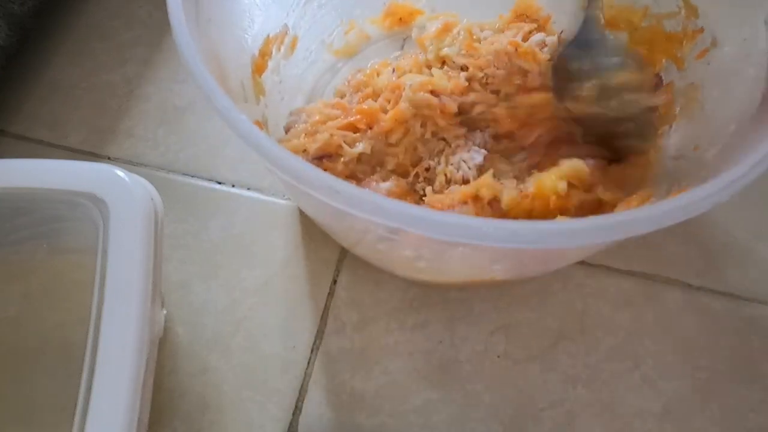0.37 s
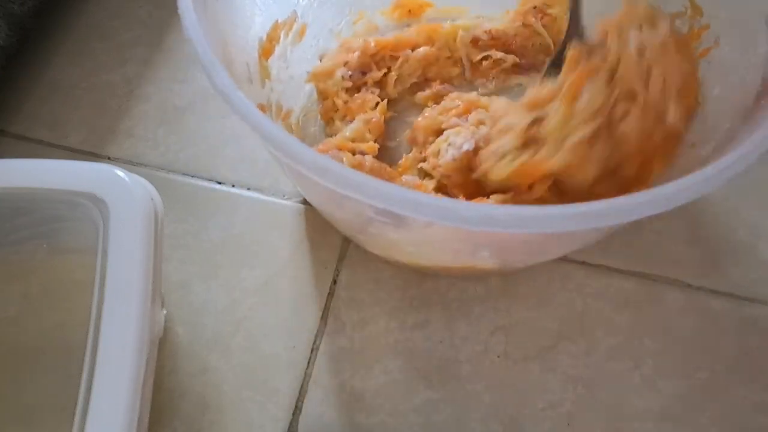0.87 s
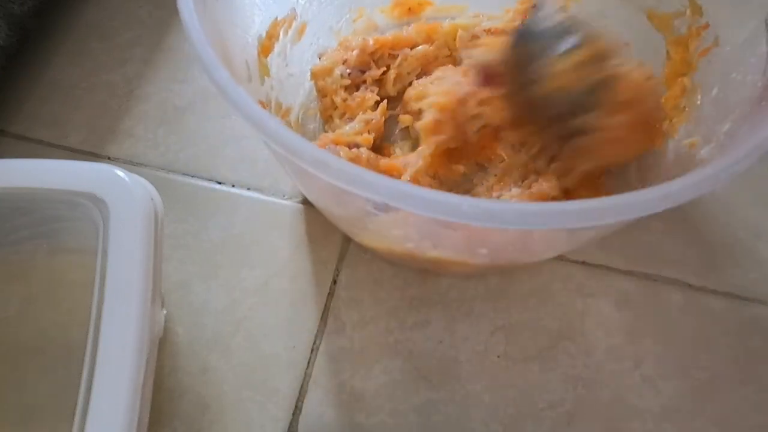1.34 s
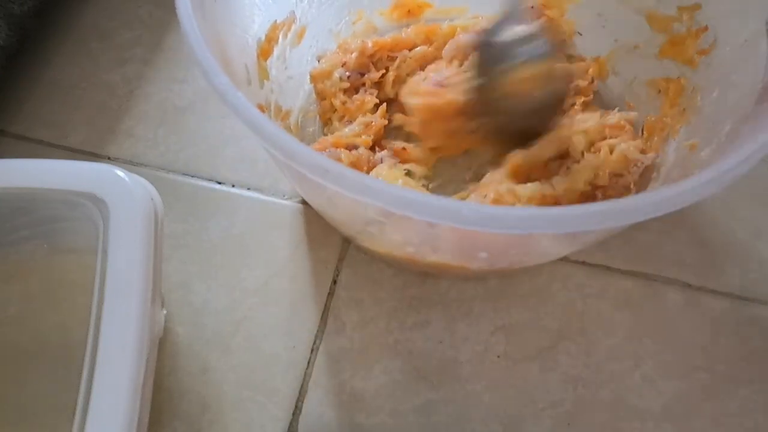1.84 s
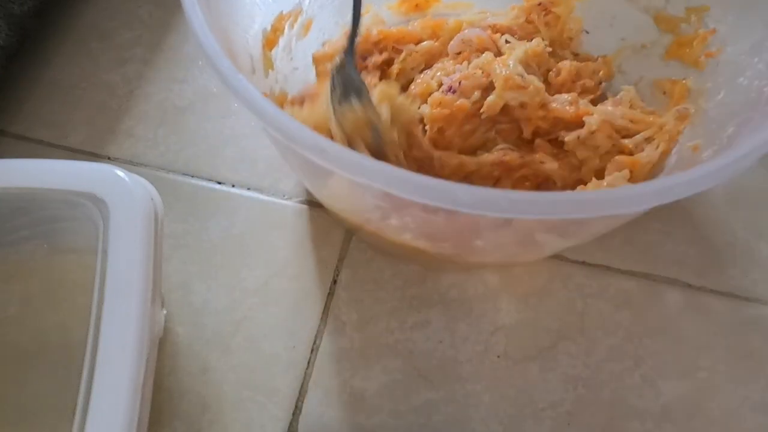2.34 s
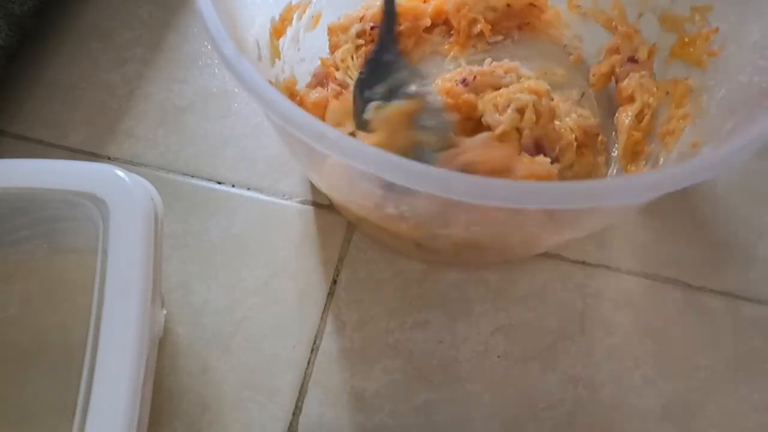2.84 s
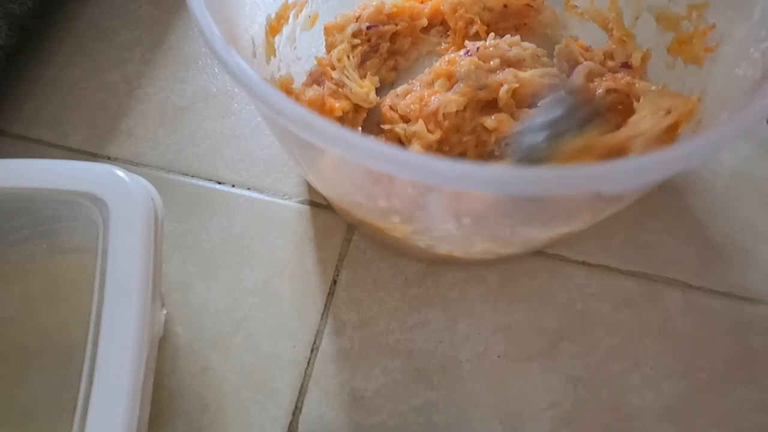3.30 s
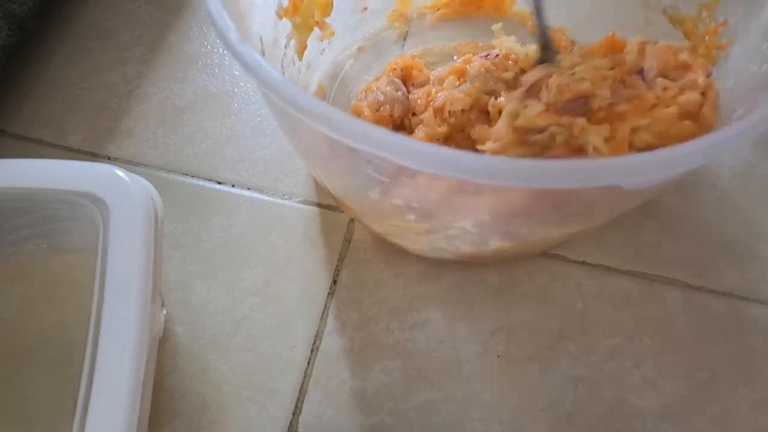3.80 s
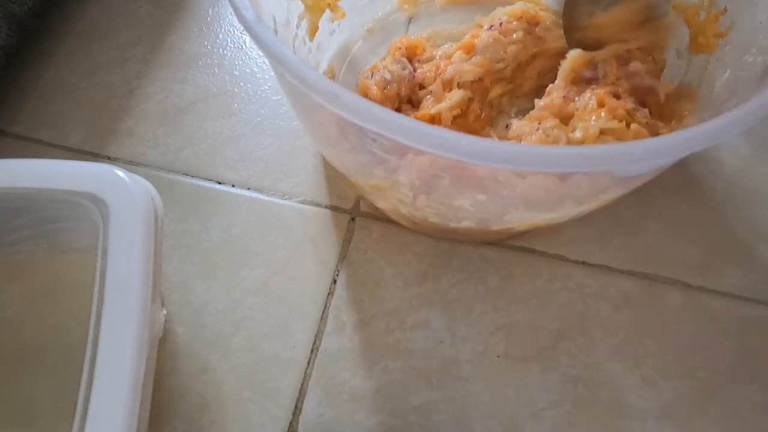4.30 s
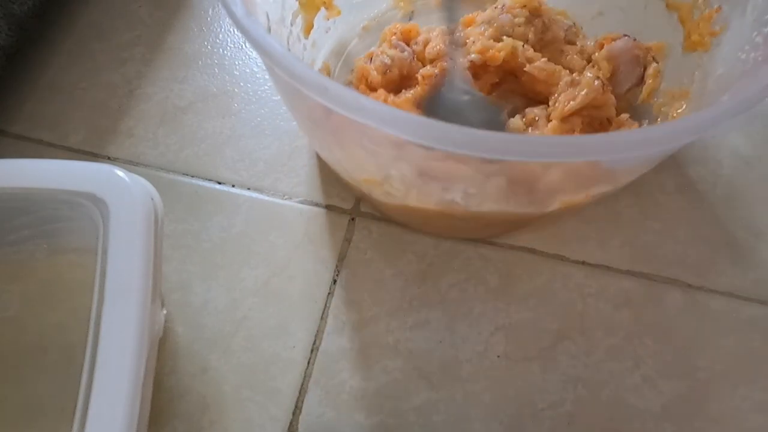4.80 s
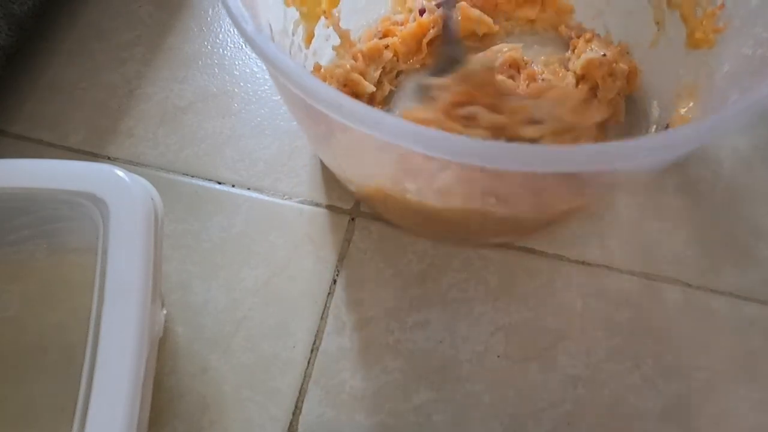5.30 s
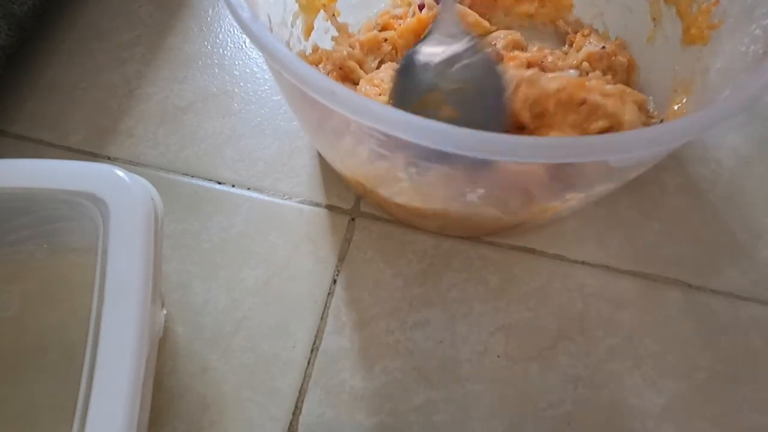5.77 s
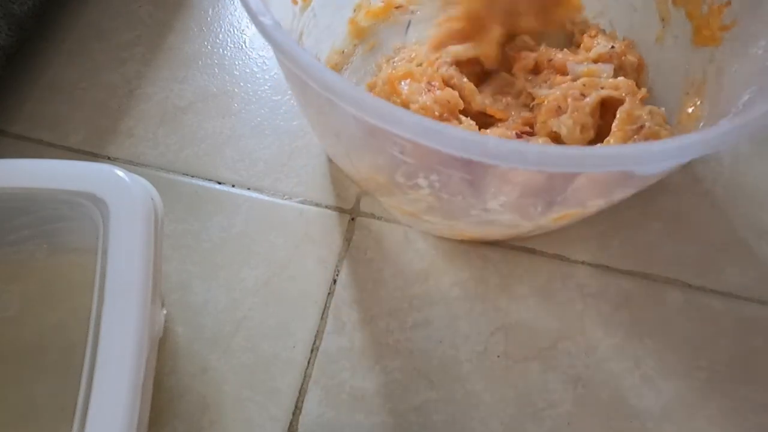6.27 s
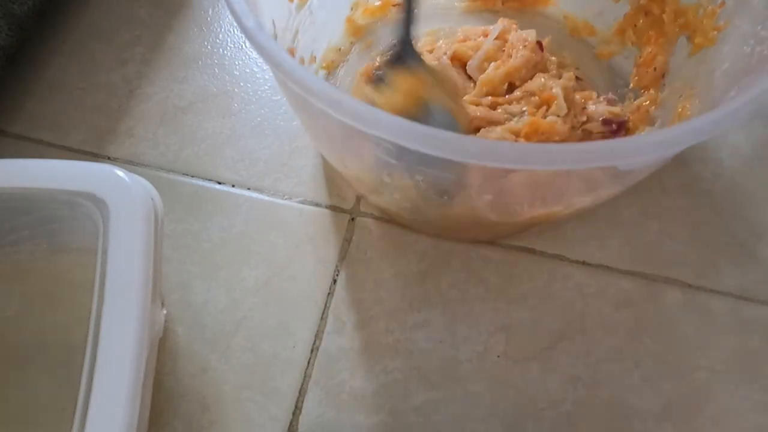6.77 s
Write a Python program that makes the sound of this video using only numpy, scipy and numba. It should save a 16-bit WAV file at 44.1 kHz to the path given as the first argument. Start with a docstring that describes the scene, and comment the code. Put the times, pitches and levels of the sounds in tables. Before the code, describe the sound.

A metal spoon briskly stirs thick, wet shredded batter in a thin plastic bowl, with sharp clicks, hollow knocks, scrapes and sticky squelches.

```python
"""A metal spoon stirs a thick, shredded batter in a thin plastic bowl on a tiled counter, close to a phone.
Its ticks are bursts of short rings; its knocks drive damped modes of the wall and the bottom.
The edge drags in stick-slip over the wall, while dense grains make wet crackle, fizz, pops and squelches.
A short echo, a low rumble with a wavering hum, faint steady tones and a hiss fill the kitchen."""
import sys
import numpy as np
from scipy import signal
from scipy.fft import rfft, irfft, next_fast_len
from scipy.io import wavfile
from scipy.ndimage import uniform_filter1d
from numba import njit

SR = 44100
rng = np.random.default_rng(int(sys.argv[2]) if len(sys.argv) > 2 else 0)


def store_wav(level_fs):
    """Save 16-bit WAV to argv[1]."""
    pcm = np.round(np.clip(np.atleast_2d(level_fs), -1, 1) * 32767)
    wavfile.write(sys.argv[1], SR, pcm.T.astype(np.int16))


def amplitude_ratio(level_db):
    """Convert a level in decibels to the matching linear amplitude (field) ratio."""
    exponent = np.asarray(level_db, float) / 20
    return 10 ** exponent


N = 303672
T = np.arange(N) / SR
SIDES = np.array([[1], [-1]])  # spreads a side signal to left and right

# ticks of the spoon's edge: (time [s], relative level [dB], pitch [Hz], chatter length [ms])
TICKS = [(0.0284, -12, 2010, 5.95), (0.1153, -21, 1980, 9.2), (0.188, -27, 4200, 3.5),
         (0.2512, -22.5, 2420, 4.9), (0.2992, -21.5, 2570, 5.1), (0.4066, -26, 3770, 4),
         (0.5189, -21.5, 5130, 3), (0.5773, -8, 1190, 2.96), (0.5773, -6.5, 2120, 2.8),
         (0.6404, -26.5, 4850, 4), (0.6792, -21, 2050, 5.9), (0.813, -19, 2140, 4.4),
         (0.835, -23.5, 4000, 5), (0.8824, -15.5, 2380, 13), (0.8818, -11.5, 1440, 9.9),
         (0.886, -13.5, 4400, 8), (0.927, -17, 5550, 6), (0.934, -14.5, 3700, 8), (0.9541, -13, 1510, 8.2),
         (1.0084, -15, 2100, 7.3), (1.052, -22, 1170, 10), (1.068, -24, 2330, 5.3), (1.261, -22, 2580, 3.8),
         (1.4463, -24, 1330, 5.3), (1.491, -21.5, 4280, 4.8), (1.5204, -26.5, 4630, 4),
         (1.691, -24.5, 4960, 8.5), (1.702, -16, 2130, 15), (1.7566, -23, 4100, 5.4),
         (1.7742, -7, 2310, 4.9), (1.8846, -21, 4000, 3.5), (1.9655, -17, 2420, 2.2),
         (2.0063, -24.5, 2760, 5.1), (2.049, -27, 4800, 3.1), (2.153, -21.5, 5440, 2.4),
         (2.212, -17, 1620, 5.1), (2.269, -27, 4930, 3.7), (2.358, -30.5, 6500, 4), (2.385, -27.5, 4670, 4),
         (2.5139, -9.5, 1850, 7), (2.5434, -19, 3700, 12), (2.581, -27, 3700, 6.3), (2.62, -17, 2200, 5.6),
         (2.655, -19, 6160, 8), (2.6607, -9.5, 6200, 20), (2.671, -17.5, 2480, 5.9), (2.704, -23, 8800, 10),
         (2.7625, -19.5, 1810, 2.3), (3.017, -8.5, 1590, 4.7), (3.0595, -17, 2500, 4.6),
         (3.104, -21.5, 3620, 5.3), (3.1724, -25, 6600, 18), (3.1974, -24.5, 6600, 3.6),
         (3.29, -24, 3640, 3.5), (3.303, -15.5, 3130, 4.3), (3.3084, -5, 1280, 2.6), (3.309, -3, 3250, 2.5),
         (3.378, -24, 2300, 4.8), (3.396, -29.5, 5500, 6.2), (3.4762, -23, 2400, 6.3),
         (3.491, -29.5, 5500, 3), (3.5324, -7.5, 1040, 5.8), (3.574, -20.5, 2220, 6.1),
         (3.6447, -14, 1490, 2.35), (3.6987, -20, 2520, 8), (3.8007, -14, 3700, 4.5),
         (3.814, -6, 4900, 6.8), (3.823, -15, 5500, 7), (3.8487, -13, 3550, 5.3), (3.936, -12, 1280, 2.83),
         (3.9901, -12, 1310, 2.4), (3.9927, -22, 3930, 3), (4.2017, -5, 2520, 2.48), (4.2018, -14, 6000, 3),
         (4.228, -26.5, 2950, 4.7), (4.274, -24, 2495, 4.1), (4.282, -22.5, 2470, 3.7),
         (4.287, -25.5, 5400, 3.7), (4.43, -18, 1380, 3.5), (4.509, -14.5, 3500, 6.9),
         (4.5153, -6, 1530, 8.7), (4.543, -26.5, 7600, 3.4), (4.64, -26.5, 6100, 4.4),
         (4.66, -24.5, 5400, 4), (4.672, -24.5, 2020, 8), (4.726, -21.5, 1510, 7.4), (4.7436, -23, 5330, 5),
         (4.781, -20.5, 5000, 6.3), (4.8178, -28, 4190, 4), (4.885, -20.5, 1910, 7.1),
         (4.9475, -20, 5940, 3.3), (5.0818, -20, 3670, 25.5), (5.0978, -15.5, 1420, 6.8),
         (5.106, -16, 1130, 8.7), (5.1245, -10, 1820, 6.1), (5.133, -8.5, 1610, 12),
         (5.171, -22.5, 5300, 5.3), (5.182, -19, 5160, 4.6), (5.206, -20, 5360, 4), (5.207, -18, 2360, 5.3),
         (5.24, -18, 5900, 6), (5.25, -4, 5030, 4.6), (5.253, -9, 1880, 6), (5.3073, -21, 2360, 4),
         (5.3256, -23, 2160, 4), (5.339, -13, 3900, 6.3), (5.4177, -25, 7100, 4), (5.441, -21, 3900, 10),
         (5.5456, -24, 935, 7.5), (5.5429, -16.5, 2500, 11.7), (5.5669, -14, 1010, 6),
         (5.771, -27.5, 1470, 5), (5.8177, -13.5, 956, 3.2), (5.918, -22.5, 4870, 3.15),
         (5.9882, -25, 2640, 6.3), (6.006, -26, 3220, 4), (6.0182, -13, 3640, 10), (6.0192, -18, 1330, 5.4),
         (6.101, -30, 2860, 3.1), (6.113, -31, 3540, 3), (6.1984, -18, 2720, 3.44),
         (6.238, -13.5, 1040, 10), (6.2658, -15.5, 1300, 9.6), (6.2901, -20.5, 2240, 4.6),
         (6.344, -13.5, 1250, 8.3), (6.385, -15, 2820, 3), (6.468, -17, 5800, 20),
         (6.474, -11.5, 7900, 13.2), (6.509, -15, 5670, 14), (6.515, -15.5, 9600, 22),
         (6.4939, -10, 2530, 5.4), (6.5834, -18.5, 1850, 5.9), (6.7379, -15.5, 2220, 10.1),
         (6.812, -9.5, 1590, 3.7), (6.812, -14, 6430, 3)]
# knocks on the bowl: (time [s], relative wall ring [dB], relative bottom thud [dB], pitch of the struck spot [Hz])
KNOCKS = [(0.0307, -23, -16, 372), (0.1177, -24.5, -23, 340), (0.5798, -13.5, -9, 340),
          (0.8861, -25, -61, 660), (0.9568, -19.5, -40, 345), (1.01, -20, -22.5, 353),
          (1.0344, -20, -54, 413), (1.262, -31.5, -20.5, 417), (1.7113, -24.5, -18, 650),
          (1.7755, -14, -22, 406), (1.9678, -15.5, -17.5, 385), (2.2132, -32, -21, 437),
          (2.5154, -29.5, -63, 423), (2.5552, -63, -26, 353), (2.7154, -18.5, -47, 710),
          (2.7765, -15, -19, 385), (3.0189, -24, -18.5, 367), (3.1243, -23, -39, 636),
          (3.3092, -11.5, -46, 1330), (3.3116, -20.5, -8, 340), (3.5342, -6.5, -53, 430),
          (3.646, -18, -36, 660), (3.868, -40, -25, 371), (3.9152, -16.5, -17, 355),
          (3.9387, -14, -46, 418), (4.2044, -22.5, -8.5, 342), (4.5178, -19.5, -10, 332),
          (4.679, -31, -24, 360), (5.089, -34, -22, 340), (5.112, -25, -37, 400), (5.128, -18, -29, 450),
          (5.1681, -21, -22.5, 430), (5.3421, -17, -30, 660), (5.5473, -26, -19.5, 338),
          (5.569, -18, -27, 660), (5.8195, -20.5, -23, 820), (6.019, -20.5, -20.5, 416),
          (6.239, -8.5, -23, 455), (6.52, -29, -23, 355), (6.5604, -27, -29, 378),
          (6.6904, -29.5, -22, 651), (1.066, -22, -34, 340), (6.8144, -22, -11.5, 346)]
# modes of the loaded bowl's wall: (frequency [Hz], relative level [dB], t60 [s])
WALL = [(340, -22.5, 0.0075), (369, -16.5, 0.18), (430, 3.5, 0.034), (517, -3, 0.02), (660, 3.5, 0.035),
        (755, -6, 0.015), (993, -0.5, 0.017), (1330, -2, 0.05), (1964, 5, 0.021)]
CRACKLE_HZ = 3314


def level(x, db):
    """Set the rms level."""
    return x * amplitude_ratio(db) / np.sqrt(np.mean(x ** 2))


def colour(x, points):
    """Filter by (frequency [Hz], level [dB]) points."""
    hz, db = np.transpose(points)
    size = next_fast_len(N)
    bins = np.arange(size // 2 + 1) * SR / size + 1
    gain = amplitude_ratio(np.interp(np.log(bins), np.log(hz), db))
    return irfft(rfft(x, size) * gain, size)[..., :N]


def ring(force, modes):
    """A force drives damped modes; a unit blow peaks near 1."""
    out = 0
    for hz, db, t60 in modes:
        pole = np.exp((2j * np.pi * hz - np.log(1000) / t60) / SR)
        out = out + amplitude_ratio(db) * signal.lfilter([1], [1, -pole], force).imag
    return out / np.sqrt(np.sum(amplitude_ratio(np.array(modes)[:, 1]) ** 2))


def clumps(hold_s):
    """Random levels that set in suddenly and sag until the next; spread near 1."""
    k = int(hold_s * SR)
    starts = np.cumsum(rng.exponential(k, 2 * N // k))
    index = np.searchsorted(starts, np.arange(N))
    sag = np.minimum((np.arange(N) - np.append(0, starts)[index]) / k, 2.5)
    steps = 0.782 * rng.standard_normal(len(starts) + 1)[index]
    return uniform_filter1d(steps - sag, size=130)


def uneven(count, spread_db):
    """Grain levels with a few loud ones among many soft."""
    return spread_db * rng.exponential(size=count)


@njit
def grains(start, hz, cycles, left, right, lag):
    """Short rings that swell for a moment and fade, each from its own direction."""
    out = np.zeros((2, N + 8192))
    for k in range(len(start)):
        fade = np.exp(-hz[k] / cycles[k] / SR)
        turn = np.exp(complex(0., 2 * np.pi * hz[k] / SR))
        z, slow, fast, i = complex(1., 0.), 1., 1., int(start[k] * SR) + 8
        while slow > .002 and i < N:
            z, slow, fast = z * turn, slow * fade, fast * fade ** 4
            out[0, i + lag[k]] += left[k] * z.imag * (slow - fast)
            out[1, i - lag[k]] += right[k] * z.imag * (slow - fast)
            i += 1
    return out[:, 8:N + 8]


def scatter(s, hz, cycles, db, pan_db):
    """Grains from times, pitches and levels; cycles are given at 3 kHz, higher grains ring more of them."""
    lag = np.round(1500 / hz * rng.standard_normal(len(s))).clip(-4, 4).astype(np.int64)  # samples
    heard = amplitude_ratio(db) * (hz < 16000)
    left, right = heard * amplitude_ratio(pan_db / 2), heard * amplitude_ratio(-pan_db / 2)
    return grains(s, np.clip(hz, 200, 16000), cycles * np.sqrt(hz / 3000), left, right, lag)


def effort():
    """Crackle, drag and fizz levels in dB: strokes and splashes rise, fall and add in power."""
    # strokes through the batter:
    # (time of most effort [s], rise [s], fall [s], wet crackle [dB], drag on the wall [dB])
    stroke_rows = [(0.13, 0.13, 0.039, -48.5, -49.5), (0.23, 0.33, 0.16, -45, -46),
                   (0.449, 0.15, 0.054, -45.5, -46.5), (0.69, 0.266, 0.11, -40.5, -40),
                   (0.82, 0.34, 0.1, -47.5, -53.5), (0.892, 0.14, 0.24, -36.5, -39),
                   (1.082, 0.147, 0.14, -45, -43.5), (1.291, 0.19, 0.065, -44.5, -45.5),
                   (1.448, 0.027, 0.14, -50.5, -50.5), (1.544, 0.092, 0.04, -43, -44),
                   (1.717, 0.013, 0.02, -42, -31), (1.781, 0.031, 0.15, -48.5, -35),
                   (1.888, 0.3, 0.02, -39, -53.5), (1.966, 0.074, 0.23, -45.5, -46.5),
                   (2.221, 0.022, 0.19, -50, -48), (2.301, 0.19, 0.043, -49, -52.5),
                   (2.401, 0.1, 0.17, -48.5, -50.5), (2.519, 0.055, 0.4, -47, -46.5),
                   (2.669, 0.1305, 0.2, -34, -38), (2.843, 0.373, 0.12, -37.5, -36.5),
                   (3.122, 0.19, 0.059, -39.5, -40.5), (3.21, 0.27, 0.079, -49, -53.5),
                   (3.335, 0.0144, 0.22, -41.5, -37), (3.473, 0.16, 0.24, -49.5, -47.5),
                   (3.545, 0.035, 0.22, -47, -36.5), (3.658, 0.252, 0.67, -42.5, -44.5),
                   (3.809, 0.083, 0.68, -37, -49.5), (3.936, 0.273, 0.23, -48.5, -37.5),
                   (4.219, 0.044, 0.15, -41.5, -39.5), (4.428, 0.021, 0.136, -43.5, -45),
                   (4.628, 0.116, 0.47, -47.5, -47), (4.781, 0.25, 0.064, -44.5, -46.5),
                   (4.96, 0.091, 0.056, -45.5, -43.5), (5.11, 0.0327, 0.3, -38, -31.5),
                   (5.248, 0.214, 0.014, -33, -39.5), (5.42, 0.72, 0.15, -42, -41),
                   (5.582, 0.094, 0.097, -40.5, -39.5), (5.7, 0.17, 0.092, -60, -56.5),
                   (5.828, 0.073, 0.1, -43, -45), (5.93, 0.084, 0.049, -51.5, -49),
                   (6.131, 0.61, 0.099, -60.5, -54.5), (6.239, 0.062, 0.75, -49.5, -37),
                   (6.475, 0.51, 0.31, -35, -53), (6.61, 0.35, 0.3, -42.5, -40.5)]
    span_db = -20  # each rise and fall spans this much
    rounding = 0.97  # over 1: a fuller top and a steeper end
    rise_s, fall_s = 0.00553, 0.0319  # of a splash
    fizz_db = -13.5  # the fizz rides on the crackle
    events = [(*row, row[3] + fizz_db) for row in stroke_rows]
    for s, tick_db, hz, _ in TICKS:
        db = min(tick_db, -9.5)  # harder ticks throw no more batter
        bright = 2.5 * np.log2(hz / CRACKLE_HZ)  # low, dry ticks throw duller batter
        events.append((s + rise_s / 2, rise_s, fall_s, db - 28 + bright, db - 32, db - 30.5 + 2 * bright))
    t = T[::32]
    settling_db = np.array([[-71], [-76], [-76]])  # the batter between strokes
    power = amplitude_ratio(settling_db + 0 * t) ** 2
    for s, rise_s, fall_s, *db in events:
        away = np.where(t < s, (s - t) / max(rise_s, .003), (t - s) / max(fall_s, .003))
        power = power + amplitude_ratio(np.array(db)[:, None] + span_db * away ** rounding) ** 2
    return [np.interp(T, t, 10 * np.log10(p)) for p in power]


def ticks():
    """The edge chatters, fading; the first grains keep the pitch and ring on, the rest spread wide."""
    s, tick_db, tick_hz, chatter_ms = np.transpose(TICKS)[..., None]
    order = np.arange(40)
    chance = rng.random((len(s), 4, 40))
    share = chance[:, 0] ** 1.5 * (order % 4 < 3)  # every fourth grain sounds at first contact
    landing_s = .001 * chance[:, 3]  # the edge lands over a millisecond
    start = s + landing_s + share * np.clip(chatter_ms, 1, 40) / 1000
    hz = tick_hz * np.exp(2.6 * np.linspace(0, 1, 40) ** 1.15 * (chance[:, 1] - .35))
    db = tick_db - 7.5 - 3.0 * np.log2(hz / tick_hz).clip(0) - 9 * share - 6 * chance[:, 2]
    pan_db = 4 * (chance[:, 3, :1] - .7) + 40 * (chance[:, 3] - .5) * (hz > 10500)
    cycles = np.broadcast_to(1.85 + 1.2 * (order < 6), hz.shape)
    return scatter(start.ravel(), hz.ravel(), cycles.ravel(), db.ravel(), pan_db.ravel())


def knocks():
    """A knock rings the wall, most near its own pitch; the heavy bottom takes a longer push."""
    # modes of the loaded bottom: (frequency [Hz], relative level [dB], t60 [s])
    bottom = [(120.5, -3, 0.095), (147, -4, 0.096), (171, -0.5, 0.077), (231, -12, 0.09)]
    s, wall_db, thud_db, spot_hz = np.transpose(KNOCKS)
    out = 0
    # modes, levels, delay [s], push length [samples], direction
    parts = (WALL, wall_db, -.0006, 20, -1), (bottom, thud_db, -.0005, 110, 1)
    for modes, db, delay_s, push, sign in parts:
        for mode in modes:
            near_db = -10.5 * np.abs(np.log2(mode[0] / spot_hz)) * (modes is WALL)
            uneven_db = 2.55 * rng.standard_normal(len(s))
            force = np.zeros(N)
            force[((s + delay_s) * SR).astype(int)] = amplitude_ratio(db + near_db + mode[1] + uneven_db)
            pushed = np.convolve(force, np.hanning(push) * 2 / push, "same")
            out = out + sign * 0.54 * ring(pushed, [mode])
    return out


def sliding(slips, mode):
    """One wall mode under the drag: it comes and goes, louder and higher when pressed harder."""
    press = clumps(.06)
    shift_s = np.cumsum(.04 * (press - press.mean())) / SR
    return np.array([np.interp(T + shift_s, T, v) for v in ring(slips * amplitude_ratio(3.4 * press), [mode])])


def dragging(grip):
    """Stick-slip of the edge drives the wall, whose modes ring most near the last struck spot."""
    slips = np.zeros((2, N))
    slips[rng.integers(0, 2, 12000), rng.integers(0, N, 12000)] = amplitude_ratio(uneven(count=12000, spread_db=2.0))
    struck = np.array(sorted(KNOCKS))
    spot_hz = np.interp(T, struck[:, 0], struck[:, 3])  # glides from spot to spot
    ringing = 0
    for mode in WALL[2:]:
        octaves = np.abs(np.log2(mode[0] / spot_hz)).clip(0, 1)
        ringing = ringing + amplitude_ratio(mode[1] - 4.5 * octaves) * sliding(slips, mode)
    both, apart = ringing * amplitude_ratio(0.93 * grip + 2.6 * clumps(0.019))
    return level(both, 0) + level(apart, -14) * SIDES


def crackle(hz, cycles, clump_db, spread, wide_db):
    """Very dense wet grains; a clump shares a pitch and a level, and its grains spread around them."""
    count = 130000
    s = rng.random(count) * N / SR
    pitch = np.interp(s, T, hz) * np.exp(spread * rng.standard_normal(count))
    db = uneven(count=count, spread_db=1.5) + np.interp(s, T, clump_db)
    return level(scatter(s, pitch, cycles, db, wide_db * rng.standard_normal(count)), 0)


def stirring(crackle_db, drag_db, fizz_db):
    """The edge drags over the wall; wet shreds smear around a moving pitch under a high fizz."""
    wetness_db = np.clip(crackle_db - drag_db, -15, 15)
    crackle_hz = CRACKLE_HZ * 2 ** (0.5 * wetness_db)  # rises as the crackle outgrows the drag
    grip = clumps(.018)  # shared, so drag, crackle and fizz flicker together
    drag = dragging(grip)
    wet_hz = crackle_hz * np.exp(.17 * clumps(.016))
    wet = crackle(wet_hz, 4.0, 2.4 * grip + 1.9 * clumps(.008), spread=.66, wide_db=3.0)
    fizz = crackle(8800 + 0 * T, 4., 2.5 * grip + 1.6 * clumps(.008), spread=.33, wide_db=10.0)
    return amplitude_ratio(drag_db) * drag + amplitude_ratio(crackle_db) * wet + amplitude_ratio(fizz_db) * fizz


def pops(crackle_db):
    """Sticky threads snap: soft broad clicks, about fifty a second, that follow the crackle."""
    pop_hz = 4200
    s = rng.random((350, 1)) * N / SR
    chance = rng.standard_normal((350, 3, 10))
    stroke_db = np.interp(s, T, crackle_db)
    pause_db = (stroke_db + 60).clip(-15, 0)  # they die out in the pauses
    db = stroke_db + 0.5 + pause_db + uneven(count=(350, 1), spread_db=1.5) + 5.3 * chance[:, 0]
    hz = pop_hz * np.exp(0.854 * chance[:, 1])
    db = db - 3.3 * np.log2(hz / pop_hz).clip(0)
    start = s + .0012 * np.abs(chance[:, 2])
    pan_db = (4.0 * chance[:, 2]).clip(-9, 9)
    return scatter(start.ravel(), hz.ravel(), 2.6, db.ravel(), pan_db.ravel())


def squelches(crackle_db):
    """Air pockets collapse: rough patches that hold near one pitch for a moment and slide."""
    s = rng.random((420, 1)) * N / SR
    chance, share = rng.standard_normal((420, 3, 1)), rng.random((420, 8))
    hz = 2400 * np.exp(.65 * chance[:, 0] + .05 * chance[:, 1] * share)
    db = np.interp(s, T, crackle_db) - 4.5 + uneven(count=(420, 1), spread_db=1.7) - 6 * share
    start = s + .014 * share
    pan_db = 2.5 * chance[:, 2] + 0 * share
    return scatter(start.ravel(), hz.ravel(), 7., db.ravel(), pan_db.ravel())


def echo(bowl):
    """The short echo off tiles and walls: decaying noise, wider in the treble."""
    # level of the echo's side signal: (frequency [Hz], level [dB])
    side_points = [(300, -16), (700, -7), (1500, 0), (12000, 0)]
    t60_s, gain_db = 0.12, 1.5
    t = np.arange(int(.3 * SR)) / SR
    tail = rng.standard_normal((2, len(t))) * amplitude_ratio(-60 * t / t60_s) * (t > .003)
    sent = colour(bowl.mean(axis=0), [(150, -12.5), (600, -6.5), (12000, -21.5)])
    echoed = signal.fftconvolve(sent[None], tail, axes=1)[:, :N]
    mid, side = amplitude_ratio(gain_db) * echoed / np.sqrt(np.sum(tail[0] ** 2))
    return mid + colour(side, side_points) * SIDES


def wavering_hum():
    """A low sine whose pitch wanders while it swells and sinks."""
    # swells of the hum: (time [s], relative level [dB])
    swells = [(0.0, -42.5), (0.69, -32.5), (0.86, -66), (1.07, -36.5), (1.19, -43), (1.28, -30),
              (1.65, -40.5), (1.67, -53), (2.01, -31.5), (2.09, -47), (3.18, -47.5), (3.32, -29.5),
              (3.39, -43.5), (4.27, -40.5), (4.37, -53), (4.54, -46), (4.77, -65), (4.97, -34),
              (5.04, -49.5), (5.08, -46), (5.29, -62), (5.6, -38), (5.66, -47.5), (6.89, -40)]
    span = int(.3 * SR)
    wander = uniform_filter1d(uniform_filter1d(rng.standard_normal(N), size=span), size=span)
    hz = 56 + 2.2 * wander / wander.std()
    hum = np.sin(2 * np.pi * np.cumsum(hz) / SR)
    s, db = np.transpose(swells)
    return amplitude_ratio(np.interp(T, s, db)) * level(hum, 1.35)


def low_rumble(drag_db):
    """Low noise, nearly alike left and right: an unsteady floor plus what the drag shakes into the counter."""
    # spectrum of the rumble: (frequency [Hz], relative level [dB per Hz])
    rumble_points = [(20, 12.5), (40, -1.5), (80, 4), (120, -4.5), (185, 2), (240, -13.5), (300, -12.5),
                     (430, -14.5), (540, -35), (900, -70)]
    mid, side = colour(rng.standard_normal((2, N)), rumble_points)
    rumble = level(mid, 0) + level(side, -19.5) * SIDES
    floor_db = -35.5 + 1.9 * uniform_filter1d(clumps(.09), size=900)
    return np.hypot(amplitude_ratio(floor_db), amplitude_ratio(drag_db + 2.5)) * rumble


def steady_tones():
    """A faint pure whine, and a drone, perhaps a fridge, of noise through narrow resonances."""
    # whine: (frequency [Hz], level [dB])
    whine_rows = [(9921, -79)]
    # drone: (frequency [Hz], level [dB])
    drone_rows = [(157, -55), (187, -53), (248, -57), (331, -58)]
    t60_s = np.log(1000) / (np.pi * 4)  # resonances 4 Hz wide
    out = 0
    for hz, db in whine_rows:
        out = out + amplitude_ratio(db) * np.sqrt(2) * np.sin(2 * np.pi * hz * T)
    for hz, db in drone_rows:
        out = out + level(ring(rng.standard_normal(N), [(hz, 0, t60_s)]), db)
    return out


def faint_hiss():
    """Coloured noise, independent left and right."""
    # spectrum of the hiss: (frequency [Hz], relative level [dB per Hz])
    hiss_points = [(300, 31), (900, 15), (1300, 26.5), (2300, 13), (6000, -23), (12000, -19), (16000, -40)]
    return level(colour(rng.standard_normal((2, N)), hiss_points), -59.5)


def scene():
    """The bowl, its short echo and the kitchen around it."""
    crackle_db, drag_db, fizz_db = effort()
    bowl = ticks() + knocks() + stirring(crackle_db, drag_db, fizz_db)
    bowl = bowl + pops(crackle_db) + squelches(crackle_db)
    kitchen = wavering_hum() + low_rumble(drag_db) + steady_tones() + faint_hiss()
    return bowl + echo(bowl) + kitchen


def low_pass(x):
    """Removes everything above the highest recorded frequency."""
    return signal.sosfilt(signal.butter(12, 16320, fs=SR, output="sos"), x)


def record(dry):
    """The phone's microphone colours the finished mix."""
    # response of the microphone: (frequency [Hz], level [dB])
    microphone = [(15, -18), (45, -2), (850, -6), (1330, 0), (1650, -6), (2300, -0.5), (3000, -1.5),
                  (6200, 2.5), (8000, -0.5), (10300, -5), (12000, -4.5), (13500, -12.5), (16000, -34)]
    mix = colour(dry, microphone)
    return low_pass(mix)


dry = scene()
out = record(dry)
store_wav(out)
```